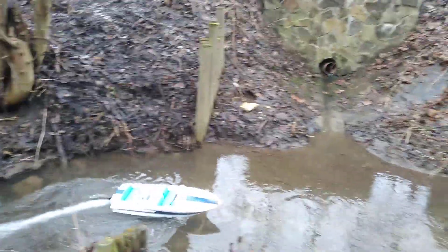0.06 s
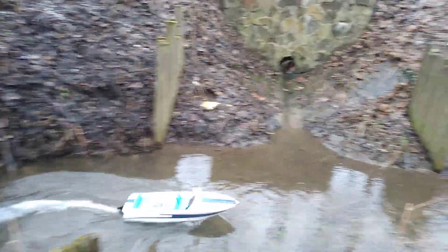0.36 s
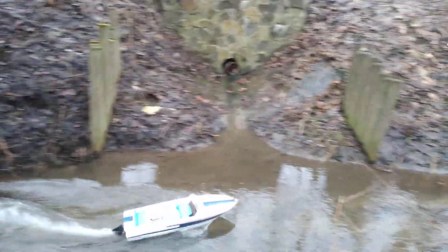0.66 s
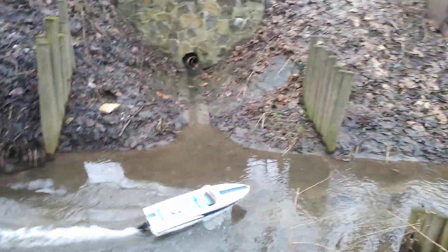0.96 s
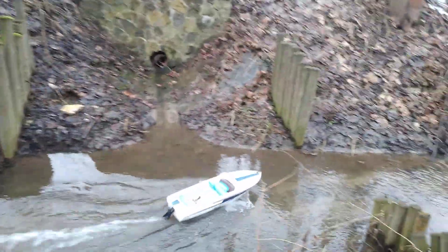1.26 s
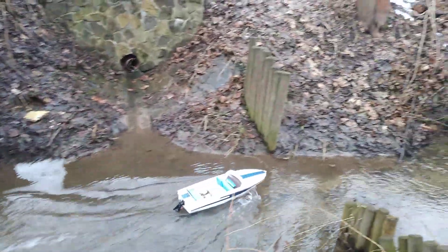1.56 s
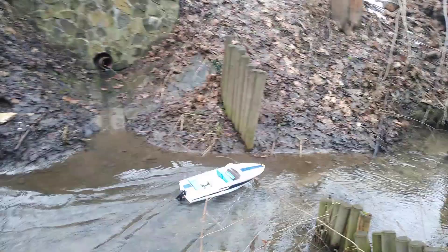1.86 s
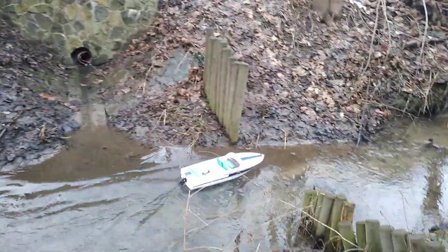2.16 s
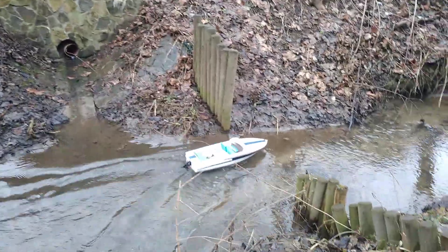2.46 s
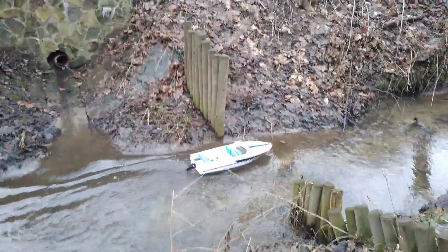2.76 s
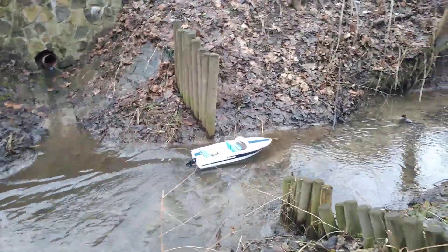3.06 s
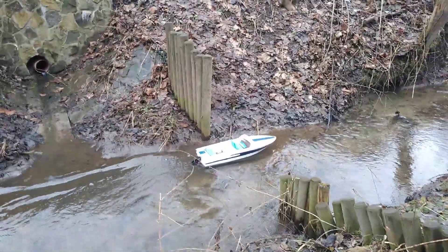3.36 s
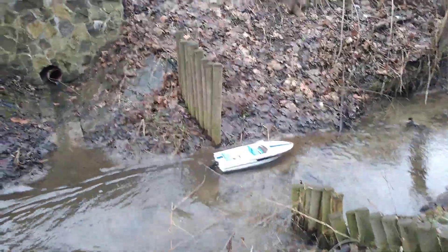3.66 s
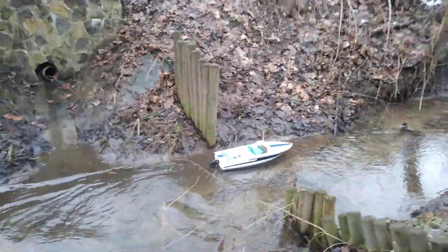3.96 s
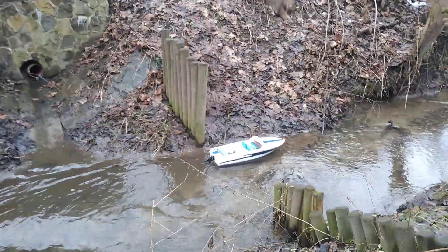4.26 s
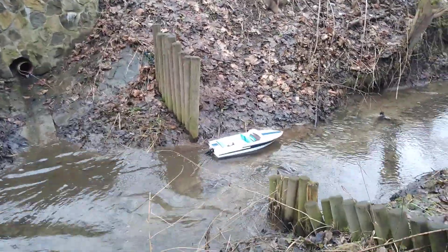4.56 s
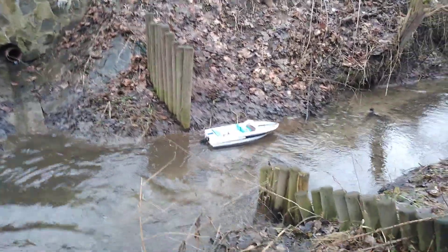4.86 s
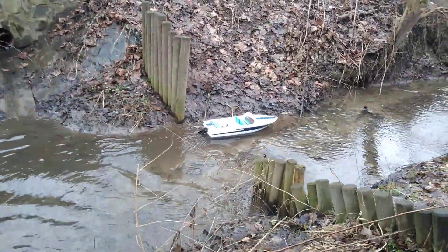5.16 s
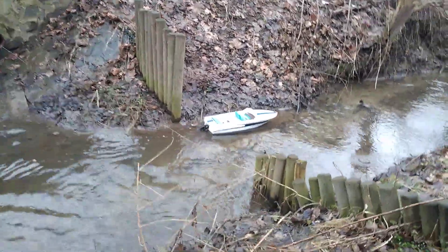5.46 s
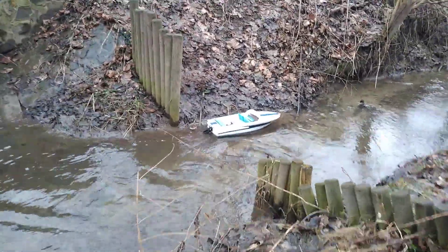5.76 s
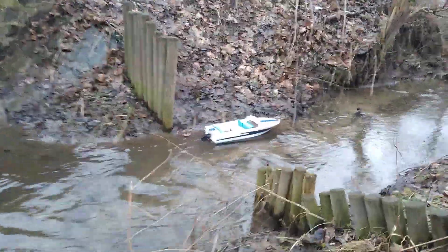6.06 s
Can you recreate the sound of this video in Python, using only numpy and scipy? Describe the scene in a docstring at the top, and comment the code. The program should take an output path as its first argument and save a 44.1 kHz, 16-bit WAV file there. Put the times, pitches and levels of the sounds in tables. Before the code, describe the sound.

A model speedboat's electric motors hum through churning water, then cut out, leaving faint clothing rustle and crackling twigs.

```python
"""Model speedboat on a stream

Two electric motors hum while the propellers churn up ringing bubbles and pattering spray.
After a second the throttle is cut, the wake fizzes out and a few drops plop back into the water.
Then clothing swishes by friction close to the microphone, a hand thumps softly on its case,
and dry leaves and twigs crackle as they fracture on the bank."""
import sys
import numpy as np
from scipy import signal
from scipy.fft import rfft, irfft, next_fast_len
from scipy.io import wavfile
from scipy.ndimage import uniform_filter1d

SR = 44100
rng = np.random.default_rng(int(sys.argv[2]) if len(sys.argv) > 2 else 0)


def put_to_file(sound):
    """Save the sound as 16-bit audio at rate SR, in the file named by the first command-line argument."""
    columns = np.atleast_2d(sound).T  # one column per channel
    safe = np.clip(columns, -1, 1)
    whole_steps = np.round(safe * 32767)
    wavfile.write(sys.argv[1], SR, whole_steps.astype(np.int16))


N = 273861
TIME = np.arange(N) / SR
FFT_SIZE = 2 * next_fast_len(N // 2 + 4096)
FFT_HZ = np.arange(FFT_SIZE // 2 + 1) * SR / FFT_SIZE
DIRECT_ONLY = np.array([[1], [0]])  # sources have two rows: (direct, scattered)


def boat():
    """Amplitude modulation: the blades pulse foam and spray, which decay as the throttle is cut."""
    surge_foam_db, surge_spray_db = surges()
    foam_db = -23.5 + surge_foam_db - 42.5 * since(0.98)
    spray_db = -28 + surge_spray_db + splashes() - 44 * since(0.94)
    speeds = [shaft_speed(final_hz, settle_s) for final_hz, settle_s, *_ in MOTOR_RUNDOWN]
    shaft_hz = np.mean(speeds, axis=0)
    turns = np.cumsum(shaft_hz) / SR
    thrust = np.clip((shaft_hz / 57) ** 4, 0, 1)
    hum = np.sqrt(thrust) * motors(speeds, lift_db=1.2 * surge_foam_db)
    beat = np.exp(0.6 * thrust * np.cos(2 * np.pi * 3 * turns + 0.54 * drift(25)))  # three blades
    lope = np.exp(0.35 * thrust * np.cos(2 * np.pi * turns))  # one blade bites harder on every turn
    churn = foam(beat * lope, thrust)
    mist = spray(beat, thrust)
    shrill = thrust ** 2 * from_db(-8) * squeal(beat)
    return hum + from_db(foam_db) * churn + from_db(spray_db) * (mist + shrill)


def shaft_speed(final_hz, settle_s, start_hz=56.2, cruise_hz=58.7, pick_up_s=0.08, cut_s=1.055):
    """Exponential relaxation: the shaft rate rises to cruising speed and runs down after the cut."""
    powered_hz = cruise_hz + (start_hz - cruise_hz) * np.exp(-TIME / pick_up_s)
    return final_hz + (powered_hz - final_hz) * np.exp(-since(cut_s) / settle_s)


# Run-down of each motor: final shaft f/Hz, time constant/s, hum level/dB, fade from t/s, fade/(dB/s)
MOTOR_RUNDOWN = [(0.996, 0.44, -45.5, 1.2, 260), (50.16, .05, -43.5, 1.15, 74)]
# Partials of motor and propeller: multiple of the shaft rate, relative level/dB, waver/dB
SHAFT_HARMONICS = [(3, 0.1, 1), (4, -13, 5.5), (5, -7.5, 3.5), (6, -17.5, 3), (9, -7.5, 2.5),
                   (15, -10.5, 5)]


def motors(speeds, lift_db):
    """Harmonic series: each drive hums at multiples of its shaft rate, wavering with the blade load."""
    hum = 0
    row_phase = np.array([[0], [3.1]])  # the two rows are nearly in antiphase
    for shaft_hz, (_, _, hum_db, hold_s, fade_db_per_s) in zip(speeds, MOTOR_RUNDOWN):
        turns = np.cumsum(shaft_hz) / SR
        gain = np.sqrt(2) * from_db(hum_db + lift_db - fade_db_per_s * since(hold_s))
        for multiple, level_db, waver_db in SHAFT_HARMONICS:
            phase = 2 * np.pi * multiple * turns + 0.045 * waver_db * drift(15) + 0.17 * drift(50)
            hum += gain * from_db(level_db + waver_db * drift(14)) * np.sin(phase + row_phase)
    return hum


def bubbles(beat, per_s=6500, cycles=26, wash_db=5, sizes=30):
    """Bubble resonance: air whipped under water rings at pitches set by size, over a wash of noise."""
    births = grains(per_s * beat, spread_db=1.5)
    size_class = rng.integers(0, sizes, N)
    rings = sum(np.sqrt(hz) * unit_rms(ring(births * (size_class == k), hz, cycles / hz))
                for k, hz in enumerate(np.geomspace(200, 4500, sizes)))
    wash = from_db(wash_db) * rng.standard_normal((2, N)) * np.sqrt(beat)
    return unit_rms(rings) + wash


# Spectra of fresh foam and of the larger bubbles lingering in the wake: f/Hz, level/dB
FOAM_SPECTRUM = [(25, -45.5), (90, -33), (215, -10.5), (330, -11), (420, -7), (540, -2), (730, -1.5),
                 (900, -3), (1150, 1), (1420, -11.5), (1750, -4), (2300, -7), (2950, -5.5), (3500, -22.5),
                 (4700, -32)]
WAKE_SPECTRUM = [(100, -12.5), (220, -15), (380, -8), (520, -3), (800, -7.5), (1130, -2.5), (1500, -12.5),
                 (2050, -4), (2800, -16.5), (4700, -27.5)]
# Modes of the plastic hull: f/Hz, bandwidth/Hz, initial level over the foam/dB, change in a turn/(dB/s)
HULL_MODES = [(403, 45, -2.5, 3), (431.5, 16, 5, -1.5), (504, 31, 4, -5), (542.6, 26, 10, -7),
              (597.6, 16, 5.5, 5), (663, 24, 12, -16.5), (789, 18, 0.5, 4), (876, 29, 5, -8),
              (903, 26, 0.5, 5), (1027, 35, -3, -2), (1085, 27, 0, 4.5), (1169, 25, 3.5, -9.5),
              (1247, 28, -2, 4.5), (1300, 30, -7.5, 10), (1714, 39, -1.5, 3)]
# Air pockets gurgling under the stern: f/Hz, bandwidth/Hz, level over the bubbles/dB
AIR_POCKET_MODES = [(487.5, 19, 9), (586, 25, 1.5), (794, 29, 0.5), (890, 47, 4)]


def foam(beat, thrust):
    """Forced vibration: churning drives the hull's modes under power, and air pockets when coasting."""
    froth = bubbles(beat)
    churn = resonate(colour(froth, FOAM_SPECTRUM), HULL_MODES, swell_db=1, wander=0.006)
    wake = resonate(colour(froth, WAKE_SPECTRUM), AIR_POCKET_MODES, swell_db=1.5, wander=0.012)
    return np.sqrt(thrust) * steady(churn) + np.sqrt(1 - thrust) * from_db(1.5) * steady(wake)


# Spectra of flung droplets and of the fizzing wake: f/Hz, level/dB
SPRAY_SPECTRUM = [(1500, -22), (3000, -3), (3500, -8), (4000, -1), (4230, -6.5), (4650, 0.5), (5200, -5.5),
                  (6400, -2), (6900, -5), (7600, -7.5), (8600, -4), (10500, -7), (12600, -7),
                  (14200, -18.5)]
FIZZ_SPECTRUM = [(1500, -21.5), (3000, -1.5), (5000, 6), (7500, -7), (9500, 4), (12500, -3.5), (14200, -9)]
# Modes of the drive's housing: f/Hz, bandwidth/Hz, level over the spray/dB
HOUSING_MODES = [(2390, 120, -0.5), (3220, 51, 4.5), (5940, 42, 0), (7130, 120, -7)]


def spray(beat, thrust):
    """Impact noise: droplets patter in spurts and ring the housing; without thrust only fizz is left."""
    patter = unit_rms(grains(9300 * beat, spread_db=1.5)) + from_db(8.5) * rng.standard_normal((2, N))
    patter = flicker(patter, depth_db=2, rate_hz=41) * from_db(0.55 * drift(68))
    mist = resonate(colour(patter, SPRAY_SPECTRUM), HOUSING_MODES, swell_db=3.5, wander=0.004)
    fizz = colour(patter, FIZZ_SPECTRUM)
    return np.sqrt(thrust) * unit_rms(mist) + np.sqrt(1 - thrust) * from_db(-5) * unit_rms(fizz)


def squeal(beat, hz=5920, width_hz=560, flutter_db=6):
    """Frictional excitation: the shaft rubs in its tube and sets off a shrill ring in uneven bursts."""
    rub = rng.standard_normal((2, N)) * beat * from_db(flutter_db * drift(51))
    return unit_rms(minimum_phase(rub, lambda f: 1 / np.sqrt(1 + (2 * (f - hz) / width_hz) ** 4)))


# The stern digs in or the wake breaks: t/s, duration/s, foam gain/dB, spray gain/dB
WATER_SURGES = [(0.154, 0.12, 3, 3), (0.463, 0.28, 2, 3), (0.782, 0.35, -0.5, 2), (1.145, 0.084, 3.2, 3.8),
                (1.288, 0.21, 5, 4.5), (1.519, 0.24, 8, 6.5), (1.69, 0.075, 1.5, -1.5)]


def surges():
    """Agitation: harder stirring changes the levels of (foam, spray), in dB."""
    return sum(np.array([[foam_db], [spray_db]]) * envelope(start, length, attack_s=0.021, release_s=0.02)
               for start, length, foam_db, spray_db in WATER_SURGES)


# Sheets of water slapping down: t/s, duration/s, spray gain/dB
WATER_SLAPS = [(0.262, 0.025, 3.5), (0.726, 0.0083, 6.5), (0.836, 0.0081, 5), (0.936, .006, 1.5),
               (0.96, 0.0074, 9), (1.006, 0.0069, 9.5), (1.048, 0.0041, 9)]


def splashes():
    """Impact transients: each falling sheet briefly raises the spray level, in dB."""
    return sum(gain_db * envelope(start, length, attack_s=0.0015, release_s=0.001)
               for start, length, gain_db in WATER_SLAPS)


# The short bright ring of a snap (first row), then small plops:
# t/s, peak level/dB, f/Hz, glide/(octaves/s), time to peak/s
RING_AND_PLOPS = [(1.7033, -24, 3300, 0, 0.0007), (1.809, -39.5, 816, 1.1, 0.0081),
                  (1.917, -39.5, 856, 3.9, 0.0057), (1.967, -38.5, 1124, 8.6, 0.0051),
                  (2.049, -44, 1490, 12, 0.0071), (2.502, -36.5, 1322, 58, 0.0053),
                  (2.655, -44, 780, 3, 0.003), (2.848, -41.5, 820, 3, 0.0022),
                  (3.098, -40, 1050, 3, 0.0015), (3.266, -39, 1390, 5, 0.0016),
                  (3.995, -33, 540, 2.6, 0.0035), (4.015, -37.5, 390, 4, 0.004),
                  (4.597, -50.5, 525, 3, 0.0061), (5.245, -36, 535, 4.8, 0.002),
                  (5.385, -38, 680, 4.4, 0.002), (5.921, -32, 614, 1.5, 0.0017),
                  (5.961, -40, 1250, 3, 0.0015)]


def ring_and_plops():
    """Resonance: a snap rings briefly; trapped bubbles plop, rising in pitch near the surface."""
    return DIRECT_ONLY * sum(from_db(peak_db) * blip(start, hz, peak_s, glide)
                             for start, peak_db, hz, glide, peak_s in RING_AND_PLOPS)


# Spectra of the cloth's swish, its hiss and the rumble of handling: f/Hz, level/dB
SWISH_SPECTRUM = [(60, -16.5), (200, -0.5), (540, 1), (800, -3), (1150, -6), (1500, -4.5), (2300, -11),
                  (3200, -20.5), (5000, -51)]
HISS_SPECTRUM = [(1500, -31), (2700, 2), (3600, 2.5), (5000, 3), (6500, 0), (7300, 1.5), (8100, 3),
                 (9200, -1), (10500, 2), (12500, -1.5), (14200, -9)]
RUMBLE_SPECTRUM = [(15, -24.5), (40, -5), (70, 5.5), (130, -4.5), (200, -5.5), (400, -19), (1000, -63.5)]


def clothing():
    """Stick-slip friction: fibres catch and release, and the movement rumbles in the microphone case."""
    swish_gain, hiss_gain, rumble_gain = rustle_gains()
    catch = from_db(2 * drift(39))
    swish = unit_rms(colour(catch * grains(3500, spread_db=2), SWISH_SPECTRUM))
    fine_slips = flicker(catch * grains(22000, spread_db=3), depth_db=1, rate_hz=16)
    hiss = unit_rms(colour(fine_slips, HISS_SPECTRUM))
    rumble = unit_rms(colour(rng.standard_normal((2, N)), RUMBLE_SPECTRUM))
    return (from_db(-0.14) * swish_gain * swish + from_db(-1.22) * hiss_gain * hiss
            + from_db(-1) * rumble_gain * rumble)


# Strokes of cloth on cloth: t/s, duration/s, level/dB, hiss offset/dB, rumble offset/dB
CLOTH_STROKES = [(1.671, 0.061, -41.5, -3.5, -9), (1.792, 0.021, -48, -1.5, -0.5),
                 (1.831, 0.16, -52.5, -1, 1), (2.027, 0.048, -49, 1.5, -6.5), (2.12, 0.012, -52.5, 1, -3.5),
                 (2.298, 0.015, -55, -4, 1.5), (2.326, 0.017, -62.5, 4, -5), (2.354, 0.019, -48, 0, 1),
                 (2.48, 0.013, -50.5, -2, -1), (2.493, 0.036, -51.5, -0.5, -6),
                 (2.634, 0.03, -45.5, -4.5, -5.5), (2.735, 0.067, -55, -3, 0),
                 (2.838, 0.016, -46.5, -3, -4), (2.961, 0.058, -47, -0.5, -3.5), (3.022, 0.042, -43, 2, -3),
                 (3.08, 0.037, -45.5, -3.5, -5), (3.24, 0.11, -48.5, -4, -0.5),
                 (3.358, 0.11, -56.5, -0.5, 2), (3.47, 0.059, -71.5, 0.5, -7), (3.561, 0.058, -55, -1, 4),
                 (3.614, 0.032, -49, -1, 1), (3.728, 0.019, -46.5, -0.5, 0),
                 (3.772, 0.044, -48.5, 2.5, 0.5), (3.854, 0.065, -48, -1.5, -6),
                 (3.948, 0.052, -42, -1.5, -6), (3.995, 0.046, -48, -2.5, 4.5),
                 (4.088, 0.032, -52.5, -3.5, -2), (4.246, 0.089, -48, -1.5, 2),
                 (4.495, 0.038, -62, -12, -10), (4.585, 0.057, -56.5, -2.5, -1.5),
                 (4.796, 0.016, -69.5, 0.5, -8), (4.836, 0.015, -61, -1, -2), (4.96, 0.13, -51, -1, -1),
                 (5.214, 0.046, -47.5, -3, -8), (5.311, 0.038, -46.5, -3.5, -8.5),
                 (5.37, 0.078, -43.5, -1, -5.5), (5.484, 0.018, -51, 0.5, -2.5),
                 (5.547, .02, -52, -1, -8.5), (5.567, 0.068, -47, 2, -9), (5.611, 0.069, -41.5, -2.5, -15),
                 (5.717, 0.11, -44.5, -1, -8), (5.903, 0.29, -48.5, 0, -5), (6.052, 0.04, -41.5, 0, -13),
                 (6.092, 0.055, -51.5, -1.5, 1.5)]
# Faint grazing between strokes: t/s, duration/s
CLOTH_GRAZES = [(1.795, 0.43), (2.258, 0.17), (2.645, 0.71), (3.574, 1.102), (4.925, 1.4)]
# Brief dropouts where the rustle cuts to near silence: t/s, duration/s, level change/dB
RUSTLE_DROPOUTS = [(2.6, 0.013, -3), (3.545, 0.012, -14), (4.713, 0.073, -25), (4.833, 0.02, -8),
                   (4.916, 0.02, -12)]


def rustle_gains(attack_s=0.023, ease_db_per_s=18.5):
    """Incoherent addition: strokes and grazing sum in power to the gains of (swish, hiss, rumble)."""
    graze = sum(envelope(start, length, attack_s, release_s=0.016) for start, length in CLOTH_GRAZES)
    power = (from_db([[-65.5], [-66], [-67.5]]) * graze * from_db(-0.5 * drift(24))) ** 2
    for start, length, level_db, hiss_db, rumble_db in CLOTH_STROKES:
        eased_db = level_db - ease_db_per_s * np.clip(TIME - start, 0, length)
        stroke = from_db(eased_db) * envelope(start, length, attack_s, release_s=0.03)
        power += (from_db([[0], [hiss_db], [rumble_db]]) * stroke) ** 2
    dropout_db = sum(change_db * envelope(start, length, attack_s=0.003, release_s=0.002)
                     for start, length, change_db in RUSTLE_DROPOUTS)
    return np.sqrt(power) * from_db(dropout_db)


# Snaps of leaves, twigs and splashes: t/s, relative crack level/dB, relative knock level/dB, decay/s
SNAP_EVENTS = [(1.4413, -25, -47, 0.00066), (1.7047, -21, -25, 0.0011), (1.863, -37.5, -52, 0.0017),
               (2.0408, -15.5, -28.5, 0.0013), (2.062, -34.5, -63.5, 0.0051), (2.132, -32.5, -39, 0.002),
               (2.307, -45.5, -64.5, 0.00395), (2.3752, -32, -36, 0.0011), (2.849, -41.5, -44, 0.0023),
               (3.098, -34.5, -47.5, 0.0007), (3.246, -49, -41.5, 0.0014), (3.267, -48, -40.5, 0.0027),
               (3.293, -37.5, -33.5, 0.0019), (3.327, -51, -38, 0.002), (3.967, -44, -38, 0.0031),
               (3.996, -28.5, -50, 0.0021), (4.976, -45.5, -47, 0.0036), (5.248, -45, -39.5, 0.0021),
               (5.352, -24.5, -35.5, 0.00094), (5.388, -49, -38, 0.001), (5.459, -34, -32, 0.0013),
               (5.5021, -32.5, -34, 0.00097), (5.6199, -17, -34.5, 0.0021), (5.6374, -34.5, -30, 0.0054),
               (5.736, -36.5, -33.5, 0.0023), (5.7591, -24.5, -27.5, 0.0018), (5.769, -34, -39, 0.0011),
               (5.7871, -15, -8.3, 0.0011), (5.8231, -23.5, -52, 0.0011), (5.8665, -42.5, -60, 0.001),
               (5.963, -59, -47.5, .003), (6.076, -36, -31.5, 0.0045), (6.0804, -22.5, -26, 0.0018),
               (6.089, -26, -43, .001)]
# Spectra of a snap's bright crack and dull crunch: f/Hz, level/dB
CRACK_SPECTRUM = [(600, -41.5), (2000, -3), (3400, -4.5), (4600, -1), (6000, -0.5), (9000, -1),
                  (10200, 2.5), (12000, -4), (14000, -6.5)]
CRUNCH_SPECTRUM = [(100, -30.5), (500, -4), (1150, 7), (1700, -16), (3300, -22.5), (6000, -31.5)]
# Modes of a twig: f/Hz, relative level/dB, time to peak/s
TWIG_MODES = [(808, -11, 0.0014), (1190, -1.5, 0.00095), (3450, -4, 0.00034)]


def snaps(tail_db=-27, tail_s=0.0135):
    """Brittle fracture: each burst gives a bright crack and a woody ring; the slower ones also crunch."""
    crack_gain, crunch_gain, wood = np.zeros((3, N))
    for start, crack_db, knock_db, decay_s in SNAP_EVENTS:
        first = int(start * SR)
        age = TIME[:min(N - first, SR // 8)]
        span = slice(first, first + len(age))
        fade = np.exp(-age / decay_s) + from_db(tail_db) * np.exp(-age / tail_s)
        crack_gain[span] += from_db(crack_db) * fade
        crunch_gain[span] += from_db(knock_db) * fade * min(decay_s / 0.0026, 1) ** 4
        wood += sum(from_db(knock_db + db) * blip(start, hz, peak_s) for hz, db, peak_s in TWIG_MODES)
    crack_noise, crunch_noise = rng.choice([-1, 1], (2, 2, N))
    crack = colour(crack_noise * crack_gain, CRACK_SPECTRUM)
    crunch = colour(crunch_noise * crunch_gain, CRUNCH_SPECTRUM)
    return from_db(0.5) * crack + from_db(11) * crunch + from_db(-2.5) * wood * DIRECT_ONLY


# Thumps of the hand on the microphone case: t/s, peak level/dB, f/Hz, time to peak/s
HAND_THUMPS = [(2.631, -45.5, 71.7, 0.01), (2.841, -50, 71.7, 0.0097), (2.963, -41.5, 74, 0.017),
               (3.099, -39, 75.4, 0.011), (3.315, -44.5, 71.8, 0.0079), (3.731, -48, 72.4, 0.0084),
               (4.021, -34.5, 74.7, 0.0069), (4.253, -35, 150, 0.007), (4.28, -40, 90, .011)]


def thumps():
    """Structure-borne sound: each shift of the grip sets the case booming for a few cycles."""
    return DIRECT_ONLY * sum(from_db(peak_db) * blip(start, hz, peak_s)
                             for start, peak_db, hz, peak_s in HAND_THUMPS)


def resonate(x, modes, swell_db, wander, turn_ends_s=2.1):
    """Modal superposition: resonances add to x, swelling and drifting as the hull rocks and turns."""
    out, samples = x, np.arange(N)
    for hz, width_hz, level_db, *db_per_s in modes:
        radius = np.exp(-np.pi * width_hz / SR)
        mode = (1 - radius ** 2) / 2 * ring(x, hz, t60=np.log(1000) / (np.pi * width_hz))
        warped = samples + np.cumsum(wander * drift(2.52))  # uneven time bends the pitch
        turn_db = sum(db_per_s) * np.minimum(TIME, turn_ends_s)
        gain = from_db(level_db + turn_db + swell_db * drift(2.2))
        out = out + gain * np.array([np.interp(warped, samples, row) for row in mode])
    return out


def ring(x, hz, t60):
    """Damped oscillator: each impulse starts a sinusoid that falls 60 dB in t60 seconds."""
    radius, angle = from_db(-60 / (t60 * SR)), 2 * np.pi * hz / SR
    return signal.lfilter([1, 0, -1], [1, -2 * radius * np.cos(angle), radius ** 2], x + 1e-18)


def blip(start, hz, peak_s, octaves_per_s=0):
    """Transient oscillation: a tone swells to 1 at peak_s and decays, gliding up 0.6 octave at most."""
    out, first = np.zeros(N), int(start * SR)
    age = TIME[:min(N - first, int(20 * peak_s * SR))]
    pitch_hz = hz * 2 ** np.minimum(octaves_per_s * age, 0.6)
    swell = (age / peak_s) ** 2 * np.exp(2 - 2 * age / peak_s)
    out[first:first + len(age)] = swell * np.sin(2 * np.pi * np.cumsum(pitch_hz) / SR)
    return out


def grains(per_s, spread_db):
    """Shot noise: random clicks of uneven size, each shared between the rows by a random direction."""
    born = rng.random(N) < per_s / SR
    sizes = from_db(spread_db * np.minimum(rng.exponential(1, N), 4))
    direction = rng.uniform(0, 2 * np.pi, N)
    return born * sizes * np.array([np.cos(direction), np.sin(direction)])


def drift(rate_hz, step=40):
    """Low-pass noise: a smooth random wander of unit RMS."""
    pole = np.exp(-2 * np.pi * rate_hz * step / SR)
    noise = rng.standard_normal(N // step + 2002)
    slow = signal.lfilter([1], [1, -2 * pole, pole ** 2], noise)[2000:]
    return np.interp(np.arange(N) / step, np.arange(len(slow)), unit_rms(slow))


def flicker(x, depth_db, rate_hz, bands=12):
    """Independent modulation: each treble band flares and sinks on its own, heard as sizzle."""
    size = next_fast_len(N)
    spectrum, hz = rfft(x, size), np.arange(size // 2 + 1) * SR / size
    centres_hz = np.geomspace(2000, 14000, bands)
    parts = (irfft(spectrum * np.interp(hz, centres_hz, band), size)[:, :N] for band in np.eye(bands))
    return sum(from_db(depth_db * drift(rate_hz)) * part for part in parts)


def steady(x, span_s=0.036):
    """Division by the running RMS evens out swells and keeps the grain."""
    power = uniform_filter1d(np.mean(x ** 2, axis=0), int(span_s * SR))
    return x / np.sqrt(np.maximum(power, 0) + 1e-20)


def minimum_phase(x, gain_at):
    """Causal filtering: folding the cepstrum gives the minimum phase for a gain over frequency."""
    cepstrum = irfft(np.log(gain_at(FFT_HZ) + 1e-9))
    cepstrum[1:FFT_SIZE // 2] *= 2
    cepstrum[FFT_SIZE // 2 + 1:] = 0
    return irfft(rfft(x, FFT_SIZE) * np.exp(rfft(cepstrum)))[..., :N]


def colour(x, spectrum):
    """Spectral shaping by a table of f/Hz, level/dB."""
    return minimum_phase(x, lambda hz: from_db(at_hz(spectrum, hz)))


def at_hz(points, hz):
    """Interpolation on a logarithmic frequency axis."""
    f, value = np.transpose(points)
    return np.interp(np.log(np.maximum(hz, 1)), np.log(f), value)


def envelope(start, length, attack_s, release_s):
    """Linear rise, hold at 1, exponential decay."""
    age = TIME - start
    return np.clip(age / attack_s, 0, 1) * np.exp(-np.clip((age - length) / release_s, 0, 40))


def since(start):
    """Seconds elapsed since a moment; zero before it."""
    return np.maximum(TIME - start, 0)


def from_db(db):
    """Amplitude ratio of a level."""
    return 10 ** (np.asarray(db) / 20)


def unit_rms(x):
    """Normalisation to unit power."""
    return x / np.sqrt(np.mean(x ** 2) + 1e-20)


# Stereo width of the boat and of nearby sounds: f/Hz, side over mid level/dB
BOAT_SIDE_LEVEL = [(40, 16.5), (90, 2), (170, -8), (290, -6), (450, -10.5), (850, -15.5), (1060, -41.5),
                   (1350, -12.5), (1800, 5), (2000, 11), (2140, 52.5), (2480, 39), (2660, 1.5), (3000, 6),
                   (3300, -19), (3550, -17), (3950, 1.5), (4200, 2.5), (4450, 14), (4850, 13), (5200, 0),
                   (5800, -8.5), (6300, 3), (7000, 0.5)]
NEAR_SIDE_LEVEL = [(40, 11), (90, 11), (200, 1), (350, -1), (850, -7), (1130, -27.5), (1400, -3),
                   (1900, -0.5), (2250, 20), (2700, -0.5), (3100, -2.5), (3420, -15.5), (3850, -4.5),
                   (4200, 5.5), (4550, 14.5), (5150, -0.5), (5750, -9), (6500, 2.5), (9000, 0)]
# Level difference between the microphones: f/Hz, left over right level/dB
BOAT_LEAN = [(90, 1.5), (170, 2), (500, -0.5), (1150, -0.2), (1650, 6.5), (2100, -0.5), (2500, 0.5),
             (2850, 3), (3300, 0), (3900, -2.5), (4600, 1), (8000, -2.5), (11000, -1.5), (13000, -3)]
NEAR_LEAN = [(100, 0.78), (1200, 1.5), (1700, 1.7), (2300, -0.88), (6500, -0.26), (10000, 0.19),
             (13000, -1)]
# Direct sound in the side signal, signed by which microphone it reaches first: f/Hz, correlation
BOAT_CORRELATION = [(150, -0.6), (2500, -0.6), (6000, -0.5), (9000, -0.33)]
NEAR_CORRELATION = [(150, 0.4), (2500, 0.6), (6000, 0.45), (9000, 0.35)]


def microphones(sound, side_level, lean, correlation):
    """Mid-side stereophony: a close pair hears some bands in phase, others opposed; (left, right)."""
    direct, scattered = rfft(sound, FFT_SIZE)
    alike = at_hz(correlation, FFT_HZ)
    width = from_db(at_hz(side_level, FFT_HZ))
    mid = direct / np.hypot(1, width)
    side = (1j * alike * direct + np.sqrt(1 - alike ** 2) * scattered) * width / np.hypot(1, width)
    lean_db = at_hz(lean, FFT_HZ) * np.array([[0.5], [-0.5]])
    return irfft(np.array([mid + side, mid - side]) * from_db(lean_db), FFT_SIZE)[:, :N]


def scene():
    """Superposition of the boat on the stream, small sounds nearby and very still air."""
    air = from_db(-104) * rng.standard_normal((2, N))
    near = ring_and_plops() + clothing() + snaps() + thumps()
    return (microphones(boat(), BOAT_SIDE_LEVEL, BOAT_LEAN, BOAT_CORRELATION)
            + microphones(near, NEAR_SIDE_LEVEL, NEAR_LEAN, NEAR_CORRELATION) + air)


def record(dry, stopband_hz=14750):
    """Band limiting: a steep low-pass filter removes the top of the treble."""
    return signal.sosfilt(signal.cheby2(20, 60, stopband_hz, fs=SR, output="sos"), dry)


dry = scene()
out = record(dry)
put_to_file(out)
```